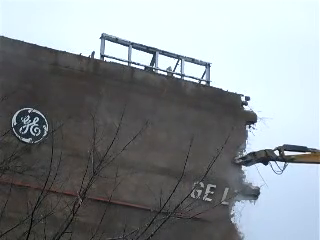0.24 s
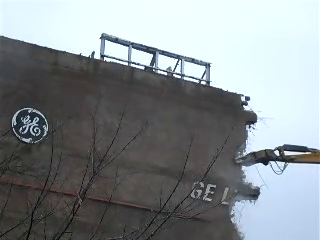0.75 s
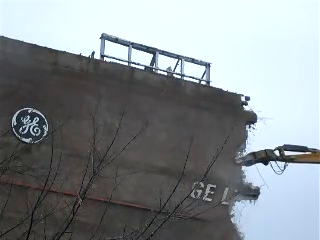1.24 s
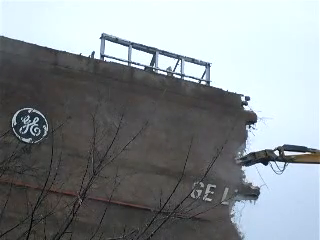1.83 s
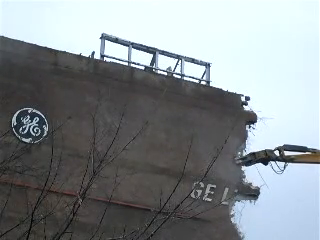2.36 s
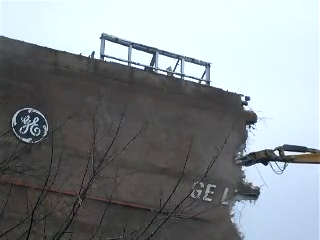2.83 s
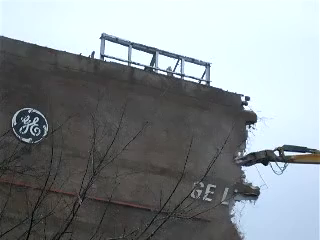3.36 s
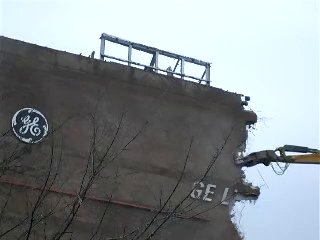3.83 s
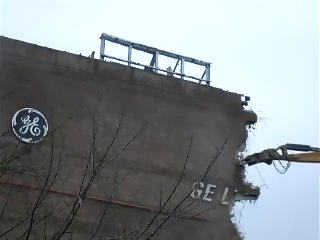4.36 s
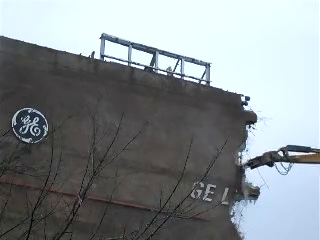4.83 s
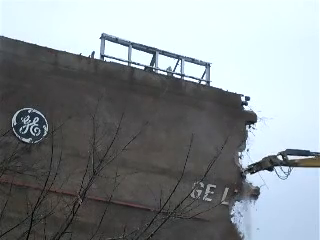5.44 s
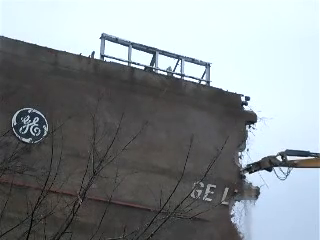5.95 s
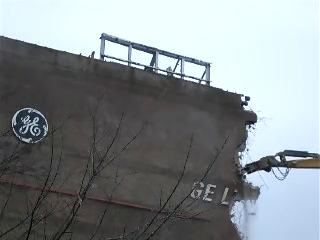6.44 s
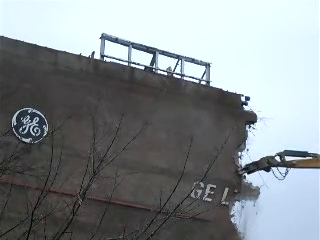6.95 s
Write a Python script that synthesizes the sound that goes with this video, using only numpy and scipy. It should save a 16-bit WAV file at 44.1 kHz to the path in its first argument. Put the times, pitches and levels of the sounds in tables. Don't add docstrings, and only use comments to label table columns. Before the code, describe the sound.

An outdoor demolition site, about 7 seconds, heard through a small camera microphone with rolled-off highs and faint hiss. A low town rumble and weak, wavering diesel drone run throughout. From the start, concrete cracks in quick, uneven bursts with a spill of grit, strong hits near 0.7, 1.1 and 1.4 s, and low thuds around 1.4 to 1.7 s. A passing car's broad tyre roar and tonal hum swell, strongest around 1.3 to 2.5 s, then fade after 3 s. At 3.1 s a steel bar snaps sharply with a thud. Quieter crumbs follow, then harder bites near 3.9, 4.1, 4.5 and 5.1 s, with short clanks of loose sheet. More lumps break and drop around 5.5 to 5.7 s. From 6 s, rubble slides down in dense clatter, thuds, clangs and trickling grit, still falling at the end. Short reflections from wall and yard colour the debris.

```python
import sys
import numpy as np
from scipy import signal
from scipy.fft import rfft, irfft
from scipy.io import wavfile
from scipy.ndimage import uniform_filter1d

SR = 44100
rng = np.random.default_rng(int(sys.argv[2]) if len(sys.argv) > 2 else 0)


def gain_from_decibels(decibels):
    exponent = np.asarray(decibels, float) / 20
    return 10 ** exponent


def int16_out(signal):
    q = np.round(np.clip(np.atleast_2d(signal).T, -1, 1) * 32767)
    wavfile.write(sys.argv[1], SR, q.astype(np.int16))


N = 317520


def level(x, db):
    return x * gain_from_decibels(db) / np.sqrt(np.mean(x ** 2))


def colour(x, points):
    hz, db = np.transpose(points)
    bins = np.fft.rfftfreq(len(x), 1 / SR) + 1
    gain = gain_from_decibels(np.interp(np.log(bins), np.log(hz), db))
    return irfft(rfft(x) * gain, len(x))


def band(x, hz, width, order=1):
    top = np.sqrt(hz ** 2 + width ** 2 / 4) + width / 2
    return signal.sosfilt(signal.butter(order, [hz ** 2 / top, top], "band", fs=SR, output="sos"), x)


def walk(rate):
    hold = int(SR / rate)
    steps = np.repeat(rng.standard_normal(N // hold + 1), hold)
    return 1.3 * uniform_filter1d(uniform_filter1d(steps, hold), hold)[:N]


def curve(table):
    s, *columns = np.transpose(table)
    return [np.interp(np.arange(N) / SR, s, column) for column in columns]


def add(out, s, sound):
    i = max(int(s * SR), 0)
    out[i:i + len(sound)] += sound[:N - i]


def crumbs(draw, scatter_db):
    size_db = scatter_db * uniform_filter1d(draw[1], size=24) * np.sqrt(24)
    return draw[0] * gain_from_decibels(size_db)


def site(db):
    # pitch in Hz, level in dB.
    rumble_tone = [(15, -44), (25, -12.5), (82, -9), (223, -10.5), (275, -7), (368, -10), (500, -12),
                   (800, -10.5), (1200, -41.5), (1560, -56.5), (2640, -120)]
    # pitch in Hz, width of its wander in Hz, level in dB.
    drone = [(39.7, 4, -40), (55.2, 2.9, -56), (78.9, 7, -43), (91.8, 6, -43.5), (162, 25, -47.5)]
    t = np.arange(N) / SR
    out = level(colour(rng.standard_normal(N), rumble_tone), 1.88) * gain_from_decibels(db + 2.0 * walk(11))
    for hz, width, line_db in drone:
        turns = hz * t + np.cumsum(width * walk(7)) / SR / 2
        out += level(np.sin(2 * np.pi * turns) * gain_from_decibels(0.75 * walk(2.9)), line_db)
    return out


def tyres(roar_db, hum_db, tread_hz):
    # pitch in Hz, level in dB.
    roar_tone = [(180, -38), (300, -7.5), (587, -1.5), (770, -5.5), (906, -4.5), (1460, -1.5),
                 (2400, -11.5), (4000, -25), (5200, -58), (8800, -120)]
    tread_width_hz = 250
    roar = level(colour(rng.standard_normal(N), roar_tone), 2.98) * gain_from_decibels(roar_db + 0.6 * walk(9))
    slow = signal.butter(2, tread_width_hz / 2, fs=SR, output="sos")
    sway = signal.sosfilt(slow, rng.standard_normal((2, N)))
    turn = 2 * np.pi * np.cumsum(tread_hz + 25 * walk(8)) / SR
    hum = sway[0] * np.cos(turn) + sway[1] * np.sin(turn)
    return roar + level(hum, -1.5) * gain_from_decibels(hum_db + 0.7 * walk(14))


def engines():
    # nearest moment in seconds, level in dB, pitch in Hz, time it is heard in seconds.
    passes = [
        (0.98, -35.5, 172, 0.28),
        (4, -37.5, 87, 0.6),
        (7.2, -41.5, 120, 0.12),
        (.15, -33, 1340, .2),
        (2.3, -32, 1500, .2),
        (0.69, -33.5, 756, 0.3),
    ]
    t = np.arange(N) / SR
    out = np.zeros(N)
    for s, db, hz, span in passes:
        note = level(band(rng.standard_normal(N), hz, 0.25 * hz, order=2), db)
        out += note * np.exp(-((t - s) / span) ** 2)
    return out


def grit(db):
    # pitch in Hz, level in dB.
    grit_tone = [(900, -31.5), (1500, -2.5), (2400, -1.5), (3700, 1.5), (5000, 0), (7000, -6.5),
                 (9000, -36)]
    slides = gain_from_decibels(1.2 * walk(45) + 0.52 * walk(14))
    rain = crumbs(rng.standard_normal((2, N)), scatter_db=2.0) * slides
    return level(colour(rain, grit_tone), 1.24) * gain_from_decibels(db)


def cracks(rows):
    out, t = np.zeros(N), np.arange(4096) / SR
    for s, db, hz, crumble in rows:
        draw = rng.standard_normal((4, len(t)))
        sharp = (1 - np.exp(-(t / 0.0023) ** 2)) * np.exp(-(t / (1.27 * crumble)) ** 1.7)
        late = (1 - np.exp(-(t / 0.007) ** 2)) * np.exp(-(t / (2.2 * crumble)) ** 1.9)
        chips = crumbs(draw[:2], scatter_db=2.5)
        crack = level(band(chips, 3640, 4100), -9.5) + level(band(chips, hz, 0.26 * hz), -16.0)
        body_db = -6 - 0.3 * (db + 13)
        body = level(band(crumbs(draw[2:], scatter_db=3.5), 1250, 1100), body_db - 7.5)
        add(out, s - 0.003, gain_from_decibels(db) * (crack * sharp + body * late))
    return out


def strays(grit_db):
    chip_db, scatter_db, chip_hz, crumble_s = -23, -2.5, 2700, 0.012
    draw = rng.random((40, 3))
    s = (np.arange(len(draw)) + draw[:, 0]) / len(draw) * N / SR
    grit_now = grit_db[(s * SR).astype(int)]
    db = chip_db + 0.3 * (grit_now + 33.5) + scatter_db * (2 * draw[:, 1] - 1)
    hz = chip_hz * 2 ** (1.5 * (draw[:, 2] - 0.5))
    return [(a, b, c, crumble_s) for a, b, c in zip(s, db, hz)]


def thuds():
    # start in seconds, peak in dB, ring in Hz, time to fade by 60 dB in seconds.
    lumps = [(0.055, -17, 754, 0.11), (1.432, -12.5, 326, 0.095), (1.624, -12, 281, 0.16),
             (1.72, -10.5, 235, 0.2), (1.724, -8.5, 537, 0.15), (2.681, -13.5, 596, 0.21),
             (3.132, -8.5, 306.4, 0.17), (4.523, -15, 522, 0.1), (4.575, -12, 531, 0.16),
             (5.117, -13.5, 739, 0.091), (5.3, -19.5, 788, 0.27), (5.442, -8, 528, 0.11),
             (5.728, -17, 542, 0.16), (6.077, -9.5, 264, 0.18), (6.11, -18, 284, 0.13),
             (6.156, -11.5, 775, 0.088), (6.43, -12.5, 767, 0.097), (6.624, -16.5, 542, 0.038),
             (6.77, -11, 504, 0.25), (6.771, -12.5, 266, 0.14), (6.962, -7, 413.5, 0.27),
             (6.964, -12, 590, 0.099), (7.001, -19, 306, 0.23), (7.036, -14, 840, 0.17),
             (7.147, -10.5, 409, 0.25), (7.172, -17, 364, 0.15)]
    clangs = [(3.897, -10, 1352, 0.073), (4.106, -20, 1085, 0.13), (4.523, -16, 537, 0.092),
              (5.117, -9.5, 1332, 0.082), (5.295, -14, 1514, 0.086), (5.327, -14.5, 1336, 0.1),
              (5.513, -15, 1338, 0.072), (6.109, -13, 541, 0.14), (6.627, -8, 528, 0.065),
              (6.734, -11, 1310, 0.066), (6.776, -14.5, 1045, 0.12), (6.894, -16, 1400, 0.077),
              (7.144, -11, 593, 0.086)]
    out, t = np.zeros(N), np.arange(12000) / SR
    for s, db, hz, t60 in lumps + clangs:
        draw = rng.standard_normal((3, len(t)))
        fade = (1 - np.exp(-t / 0.0029)) * np.exp(-np.log(1000) * (t / t60) ** 1.31)
        sag = hz * (1 + 0.045 * np.exp(-t / 0.0088))
        broken = gain_from_decibels(0.68 * uniform_filter1d(draw[2], size=300) * np.sqrt(300))
        note = np.sqrt(2) * np.sin(2 * np.pi * np.cumsum(sag) / SR) * broken
        ring = note + level(band(draw[0], hz, 0.43 * hz), -0.5)
        knock = level(band(draw[1], 1.6 * hz, 1.2 * hz), -1.5) * np.exp(-t / 0.01)
        add(out, s - 0.002, gain_from_decibels(db - 12.0) * fade * (ring + knock))
    return out


def flutter(x):
    bounce_hz, share, dull_hz = 268, 0.5, 3860
    hz = np.fft.rfftfreq(N, 1 / SR)
    returned = share / (1 + (hz / dull_hz) ** 2)
    return irfft(rfft(x) / (1 - returned * np.exp(-2j * np.pi * hz / bounce_hz)), N)


def yard_echo(debris):
    fade_s, echo_db = 0.32, -24
    t = np.arange(SR // 2) / SR
    yard = rng.standard_normal(len(t)) * np.exp(-np.log(1000) * t / fade_s) * (t > 0.008)
    return gain_from_decibels(echo_db) * signal.fftconvolve(debris, yard / np.sqrt(np.sum(yard ** 2)))[:N]


def snap():
    snap_s, snap_db, width_s = 3.1396, -4, 0.00007
    u = (np.arange(N) / SR - snap_s) / width_s
    return -gain_from_decibels(snap_db) * (1 - u ** 2) * np.exp(-u ** 2 / 2)


def scene():
    # time in seconds, roar in dB, tread hum above the roar in dB, tread pitch in Hz.
    car = [(0, -32, 4.5, 1020), (.2, -29, 2.5, 1051), (.45, -29, 6, 959.6), (.9, -29, 4, 884),
           (1.25, -27, 2, 954.8), (1.65, -28, 2, 922.4), (2.3, -26.5, 4, 890), (2.95, -28.5, 6, 962.3),
           (3.25, -29.5, -0.5, 940), (3.6, -31, 0.5, 923.6), (4.3, -35, -1.5, 938), (5.2, -39, 0.5, 935),
           (7.2, -38.5, 3.5, 919)]
    # time in seconds, level in dB.
    trickle = [
        (0, -27),
        (.14, -36),
        (2.4, -36),
        (3.3, -38),
        (4.5, -39.5),
        (5.4, -33),
        (5.75, -36),
        (6.1, -32),
        (7.2, -31),
    ]
    # start
    # in seconds, peak in dB, brightest pitch in Hz, crumble time in seconds.
    breaks = [(.03, -13, 2970, 0.0083), (.05, -13, 4300, 0.024), (.0997, -14, 1900, 0.012),
              (.1489, -11.5, 1570, 0.0081), (.2054, -10, 3400, .014), (.2556, -10.5, 1900, 0.0076),
              (.2898, -11.5, 2230, 0.022), (.3724, -17, 1590, .012), (.4134, -13.5, 1600, .018),
              (.6047, -11, 1710, 0.0057), (.7017, -8, 2230, 0.0087), (.7414, -11, 3950, .008),
              (.9769, -10.5, 2140, 0.0096), (1.108, -13.5, 1910, 0.0079), (1.1293, -5.5, 1860, .012),
              (1.2735, -14.5, 1550, 0.0059), (1.4105, -14.5, 3900, .009), (1.4324, -7.5, 2150, 0.013),
              (1.5509, -9.5, 2390, 0.0086), (1.6222, -12, 2370, 0.018), (1.719, -15, 2130, 0.025),
              (1.8728, -13, 3700, .015), (1.9487, -13.5, 1560, 0.021), (2.2164, -19, 2700, 0.012),
              (2.4382, -18.5, 1650, .01), (2.5274, -9, 1600, 0.0089), (2.8319, -15, 1560, 0.0078),
              (2.985, -13.5, 1530, 0.0097), (3.0001, -13, 1650, .012), (3.134, -9.5, 3700, 0.01),
              (3.2352, -20.5, 5250, .009), (3.2918, -19.5, 4340, 0.009), (3.5634, -22, 3760, .012),
            (3.6804, -20, 3508, .011), (3.79, -19, 4900, .016), (3.826, -20, 4300, 0.012),
            (3.8363, -12.5, 3760, 0.011), (3.894, -10.5, 2200, 0.018), (4.0966, -13, 2110, 0.011),
            (4.102, -7.5, 2320, 0.013), (4.5204, -11, 1620, 0.016), (4.5789, -9.5, 3620, .012),
            (4.627, -13, 2210, .012), (5.005, -13, 4040, .012), (5.0617, -17, 3630, .012),
            (5.1, -6, 1490, 0.01), (5.2969, -14.5, 1520, 0.013), (5.3202, -15, 2140, .012),
            (5.3473, -15.5, 4400, 0.011), (5.439, -14, 2100, 0.02), (5.4936, -9, 3400, .014),
            (5.5125, -14, 2400, .018), (5.5378, -14, 3730, 0.0088), (5.5824, -17.5, 4760, 0.0087),
            (5.708, -22, 3770, .007), (5.7286, -7.5, 3750, 0.011), (5.8256, -20.5, 2440, 0.013),
            (5.884, -12.5, 2710, 0.013), (5.948, -21, 4610, 0.0069),
              (5.972, -19.5, 5360, 0.008), (5.9892, -17, 1600, 0.011), (6.024, -11, 2420, .016),
             (6.05, -15.5, 4590, .018), (6.076, -17, 3000, .019), (6.1, -12.5, 2950, 0.02),
             (6.131, -12.5, 4800, 0.012), (6.1758, -16.5, 1510, .01), (6.2105, -18, 3840, .007),
             (6.242, -11.5, 1550, 0.011), (6.293, -12.5, 4430, .0095), (6.358, -18, 2150, 0.013),
             (6.5061, -17, 3150, .01), (6.5393, -9.5, 3660, 0.012), (6.5971, -16, 3740, 0.011),
             (6.6196, -6.5, 1550, 0.011), (6.7188, -8.5, 2190, .017), (6.7378, -21, 3730, .008),
             (6.7665, -12, 2150, 0.015), (6.7893, -21.5, 2900, 0.0098), (6.8378, -14.5, 3560, 0.0081),
             (6.891, -12, 3920, .014), (6.9243, -16.5, 4000, 0.016), (6.9661, -16, 4350, .012),
             (6.992, -16.5, 3560, 0.0071), (7.0366, -12.5, 2120, 0.011), (7.0652, -16.5, 4730, 0.0097),
             (7.0977, -18.5, 3650, .018), (7.1144, -15.5, 3790, .011), (7.148, -7.5, 4240, 0.005)]
    roar_db, tread_db, tread_hz = curve(car)
    grit_db, = curve(trickle)
    rumble_power = gain_from_decibels(-37.5) ** 2 + gain_from_decibels(roar_db - 6) ** 2 + gain_from_decibels(grit_db - 1.5) ** 2
    traffic = site(10 * np.log10(rumble_power)) + tyres(roar_db, roar_db + tread_db, tread_hz) + engines()
    shatter = cracks(breaks + strays(grit_db))
    debris = flutter(grit(grit_db) + shatter + snap()) + thuds()
    return (traffic + debris + yard_echo(debris))[None]


def microphone(sound):
    # pitch in Hz, level in dB.
    mic_tone = [(10, -31), (32, -0.5), (4900, 0), (5300, -2), (5600, -7), (5900, -6.5), (6500, -18.5),
                (7000, -35), (7400, -66.5), (7900, -130), (22050, -150)]
    hiss = level(band(rng.standard_normal(N), 6200, 2500), -45)
    return colour(sound + hiss, mic_tone) - 0.0024


def top_cut(x):
    return signal.sosfilt(signal.butter(12, 7030, fs=SR, output="sos"), x)


def record(dry):
    mix = microphone(dry[0])[None]
    return top_cut(mix)


dry = scene()
out = record(dry)
int16_out(out)
```